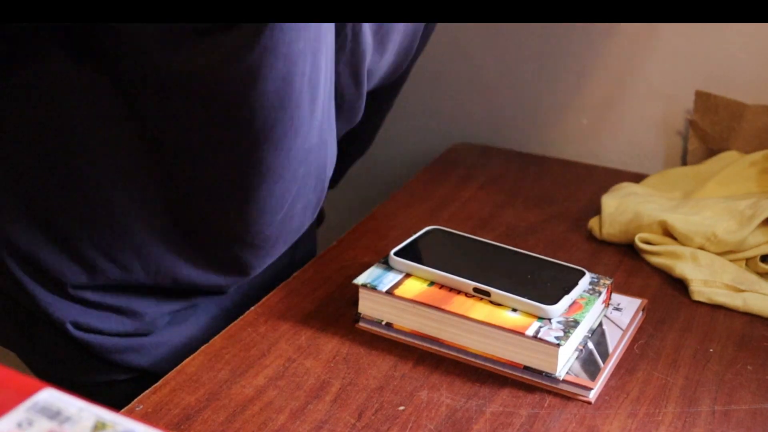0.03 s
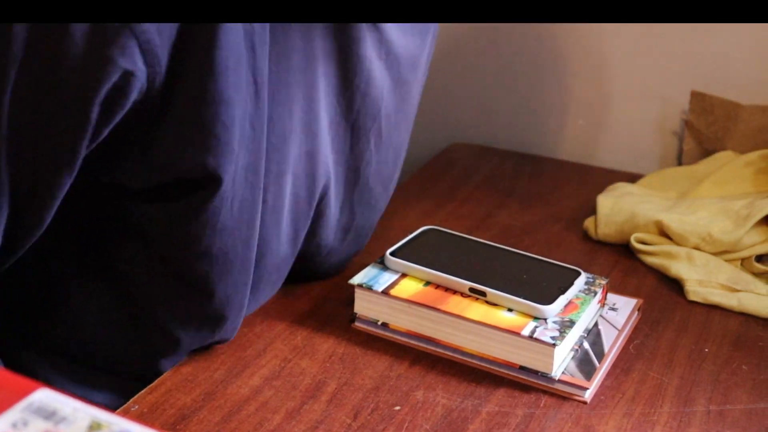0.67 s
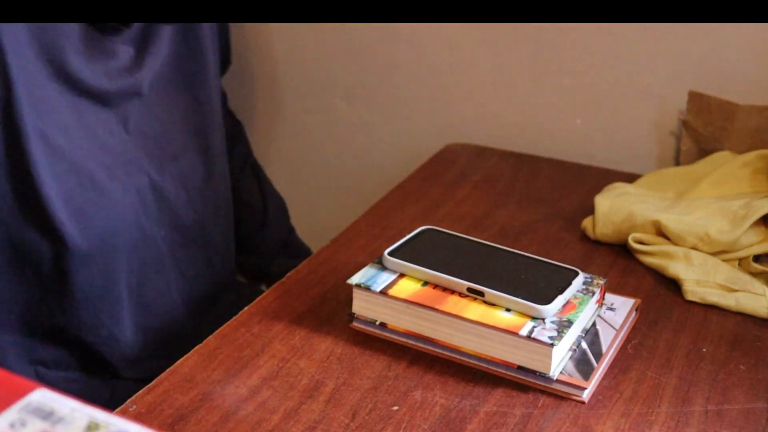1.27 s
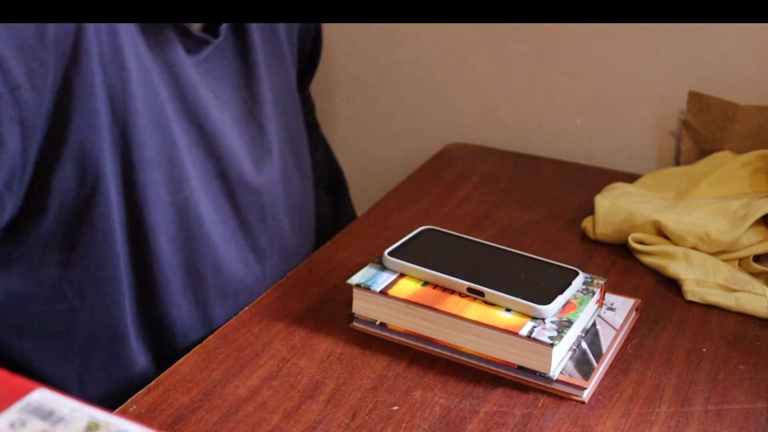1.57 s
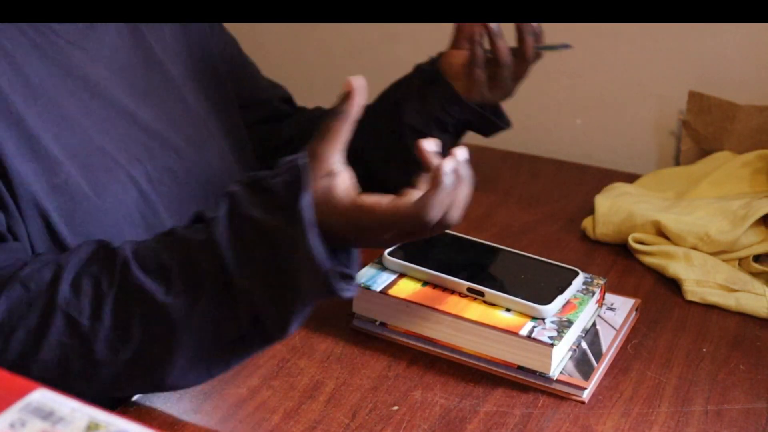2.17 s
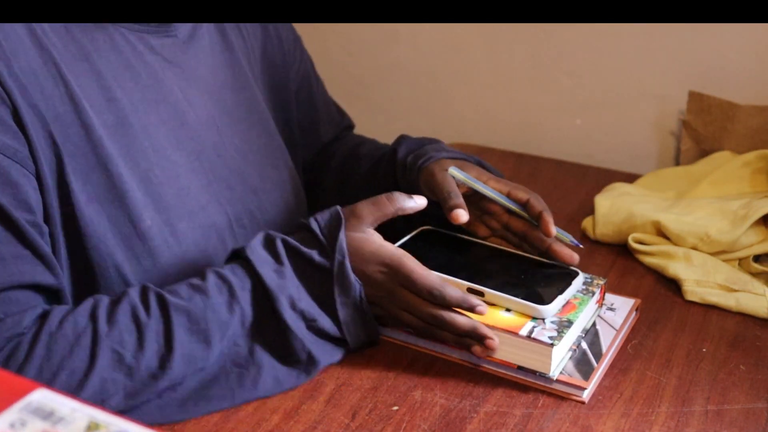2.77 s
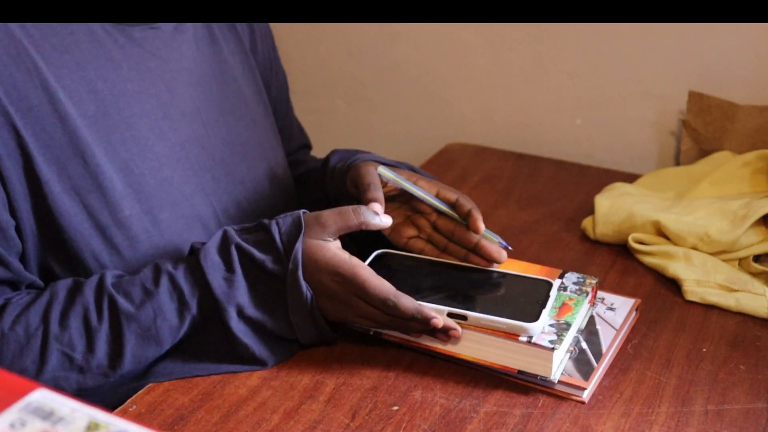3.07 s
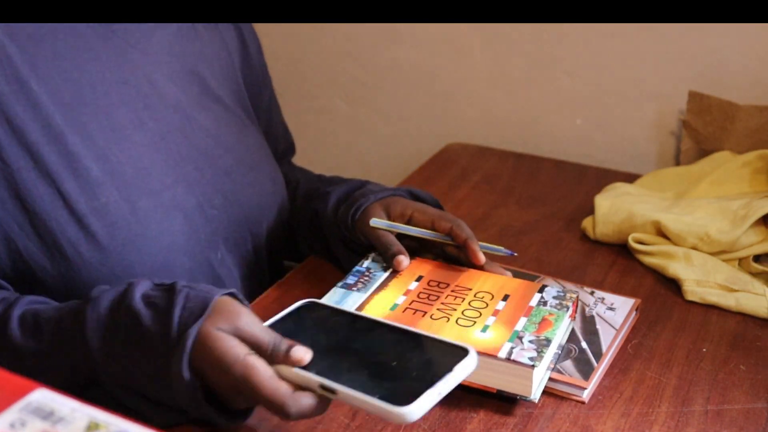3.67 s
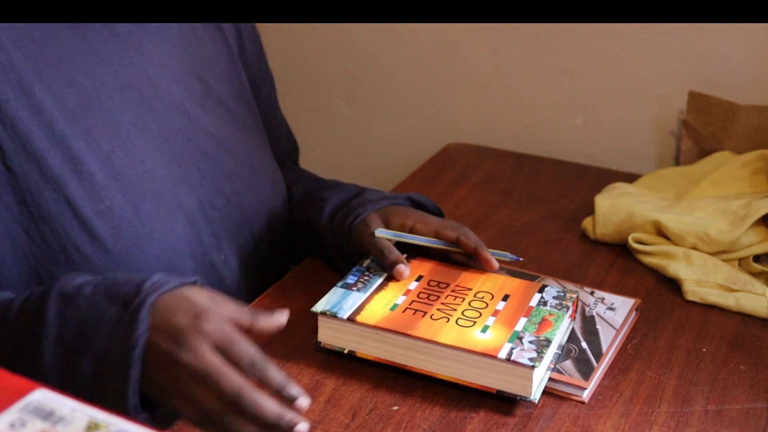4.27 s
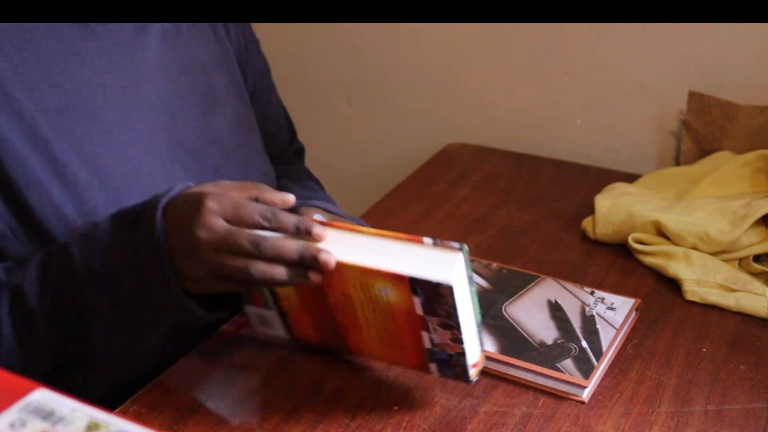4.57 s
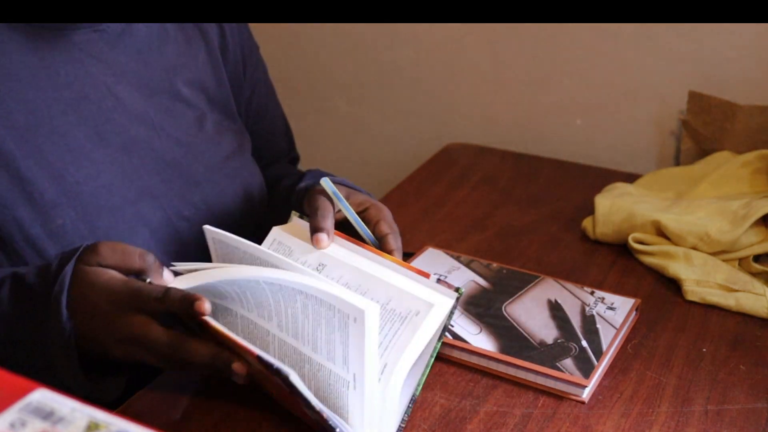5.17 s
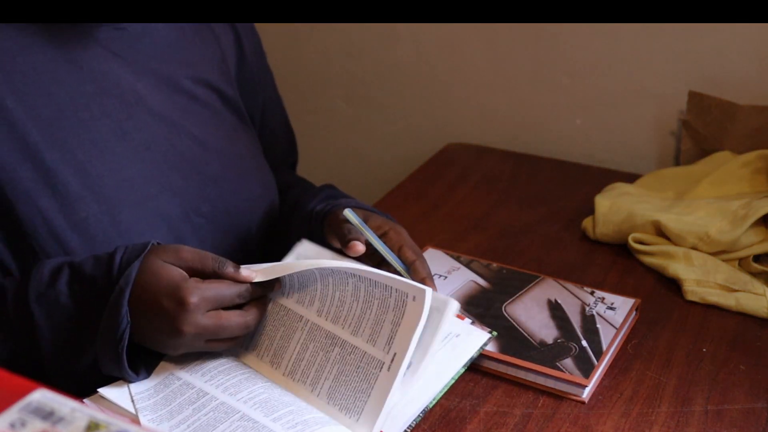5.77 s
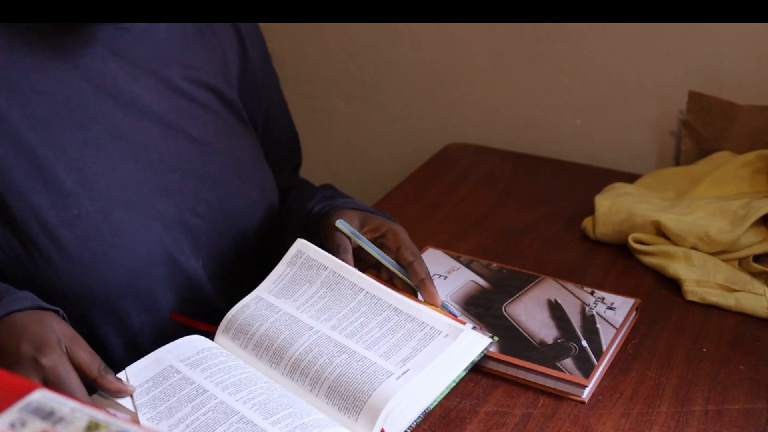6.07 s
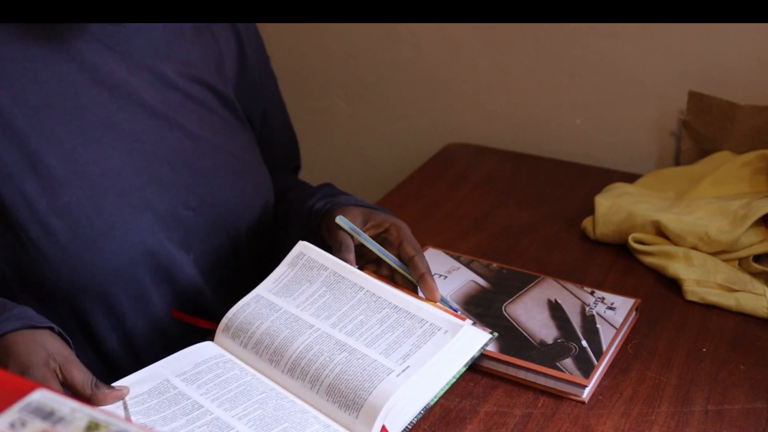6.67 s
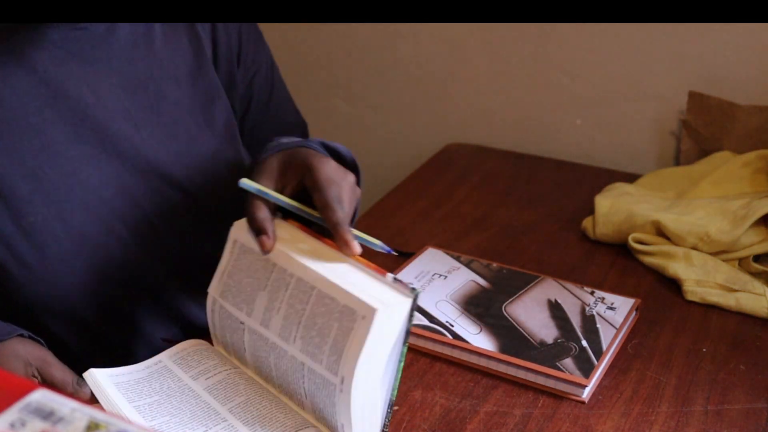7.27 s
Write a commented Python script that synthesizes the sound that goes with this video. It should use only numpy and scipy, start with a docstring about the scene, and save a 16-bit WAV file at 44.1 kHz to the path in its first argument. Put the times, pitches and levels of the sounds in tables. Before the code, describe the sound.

In a small, quiet room, a close stereo microphone picks up a desk drawer scraping open with hard knocks and banging shut, amid swishing clothes. Light taps and a hollow rub follow as a phone slides off a book, then bumps down on the wooden desk. The hardback thuds down next, and pages rustle and turn with one sharp snap. Thin, birdlike whistles sit very faintly in the room tone.

```python
"""Close stereo perspective on a wooden desk in a small, quiet room. A drawer judders open in two tugs,
cloth swishes as a pen is taken out, and the drawer rasps shut with a jolt (1.6 s). A phone rubs over a
hardback's hollow cover, then is set down in four thuds that ring the desk top (4.0-4.3 s). The book
lands on its spine with a puff of air (4.7 s), and its pages slide, crackle and flip to the end.
Room tone and a few faint, far whistles sit behind it all."""
import sys
import numpy as np
from scipy import signal
from scipy.fft import rfft, irfft, next_fast_len
from scipy.io import wavfile
from scipy.ndimage import uniform_filter1d

SR = 44100
rng = np.random.default_rng(int(sys.argv[2]) if len(sys.argv) > 2 else 0)


def pcm_store(signal):
    """Save signal as 16-bit PCM."""
    levels = np.round(np.clip(np.atleast_2d(signal), -1, 1) * 32767)
    wavfile.write(sys.argv[1], SR, levels.astype(np.int16).T)


N = 323413
T = np.arange(N) / SR
HIT_T = T[:SR // 2]  # time axis of a one-shot


def undb(db):
    """Decibels to gain."""
    return 10 ** (np.asarray(db) / 20)


def unit(x):
    """Normalise to rms 1."""
    return x / np.sqrt(np.mean(x ** 2))


def at_hz(points, hz):
    """Read a curve along a log-frequency axis."""
    f, value = np.transpose(points)
    return np.interp(np.log(hz + 1), np.log(f), value)


def equalise(x, eq):
    """Shape a sound with an EQ curve."""
    size = next_fast_len(x.shape[-1])
    gain = undb(at_hz(eq, np.fft.rfftfreq(size, 1 / SR)))
    return irfft(rfft(x, size) * gain, size)[..., :x.shape[-1]]


# Stereo width at the microphone: f/Hz, side relative to mid/dB
WIDTH = [(30, -8), (120, -9), (250, -6), (500, -4.5), (1000, -3.5), (2000, -0.5), (12000, 0)]
def spread(pair, eq):
    """Two unrelated signals become one EQ'd stereo texture at rms 1, narrow in the bass."""
    mid, side = equalise(pair, eq)
    side = equalise(side, WIDTH)
    return unit(np.array([mid + side, mid - side]))


def add(out, s, x):
    """Drop a sound on the timeline at s seconds."""
    i = max(int(s * SR), 0)
    out[:, i:i + x.shape[-1]] += x[..., :N - i]


def convolve(x, response):
    """Send a sound through an impulse response."""
    return signal.fftconvolve(x, np.atleast_2d(response), axes=-1)[:, :N]


def grains(per_s, scatter_db):
    """Friction grain: two streams of tiny slips, random in time and strength."""
    slips = rng.random(N) < per_s / SR
    strength = undb(scatter_db * np.minimum(rng.exponential(size=N), 4))
    return unit(rng.standard_normal((2, N)) * slips * strength)


def fade(t60):
    """One-shot decay, down 60 dB after t60 seconds."""
    return np.exp(-np.log(1000) * HIT_T / t60)


def burst(eq, db, rise, t60, punch=0):
    """Noise hit for a dense ring of modes; punch adds a transient, db is the rms of the first 25 ms."""
    attack = (1 - np.exp(-HIT_T / max(rise, 1e-4))) ** 2
    envelope = attack * (fade(t60) + punch * fade(0.015))
    x = spread(rng.standard_normal((2, len(HIT_T))), eq) * envelope
    return x * undb(db) / np.sqrt(np.mean(x[:, :SR // 40] ** 2))


def stroke(peak_s, length):
    """Speed of a gesture, 0-1: it swells and dies, staying within 20 dB of its peak for its length."""
    rise_share = 0.44
    away = np.maximum((peak_s - T) / rise_share, (T - peak_s) / (1 - rise_share)) / length
    return np.exp(-np.log(10) * np.minimum(away, 20))


# Room tone EQ: f/Hz, level/dB
ROOM_TONE_EQ = [(18, -60), (30, -55.5), (133, 9.5), (237, -1), (479, -2.5), (639, -2.5), (808, -0.5),
                (1050, -5), (1680, -5.5), (2020, -8), (5450, -13), (7080, -15.5), (15500, -19.5)]
def room_tone():
    """The quiet room's air: a steady, dark noise bed."""
    return undb(-60.5) * spread(rng.standard_normal((2, N)), ROOM_TONE_EQ)


# Reverb decay of the room: f/Hz, t60/s
ROOM_T60 = [(150, 0.19), (500, 0.53), (2500, 0.61), (6000, 0.29), (14000, 0.26)]
def room(x, early_db, late_db):
    """Early reflections off the desk top and near wall, then a faint tail from the rest of the room."""
    shape = (2, len(HIT_T))
    hz, s, bins = signal.stft(rng.standard_normal(shape), SR, nperseg=256)
    decay = np.exp(-np.log(1000) * s / at_hz(ROOM_T60, hz)[:, None])
    late = signal.istft(bins * decay, SR)[1][:, :len(HIT_T)]
    early_eq = [(100, -18.5), (400, 4), (1500, -1.5), (15000, -2.0)]  # f/Hz, level/dB
    early = spread(rng.standard_normal(shape), early_eq) * fade(0.14)
    response = undb(early_db) * unit(early * (HIT_T > 0.004))
    response += undb(late_db) * unit(late * (HIT_T > 0.015))
    return x + convolve(x, response / np.sqrt(len(HIT_T)))


# Thin whistles, like a far bird: t/s, length/s, f/Hz, level/dB
WHISTLES = [(.955, .14, 2417, -61), (2.18, .08, 2690, -72), (2.71, .06, 2690, -74), (3.19, .09, 2680, -72),
            (3.72, .06, 2690, -74), (3.82, .08, 1690, -72), (4.37, .13, 2229, -72), (4.55, .2, 2130, -76)]
def whistles():
    """Short, pure notes from far off, each eased in and out."""
    out = np.zeros((2, N))
    for s, length, hz, db in WHISTLES:
        t = HIT_T[HIT_T < length]
        swell = np.sin(np.pi * t / length)
        add(out, s, undb(db) * np.sqrt(2) * swell * np.sin(2 * np.pi * hz * t))
    return out


def rub_and_hiss(strokes):
    """Gain envelopes for a run of strokes; the hiss grows faster with speed than the rub."""
    rub, hiss = np.zeros(N), np.zeros(N)
    for s, length, rub_db, hiss_db in strokes:
        speed = stroke(s, length)
        rub = np.maximum(rub, undb(rub_db) * speed)
        hiss = np.maximum(hiss, undb(hiss_db) * speed ** 1.6)
    return rub, hiss


# Airy top end of sliding surfaces: f/Hz, level/dB
HISS_EQ = [(1800, -8), (4000, -1), (6000, -3), (8500, -6.5), (11000, -7.5), (15500, -12)]
def sliding(rub, hiss, rub_eq, per_s, scatter_db):
    """Fibres catch and let go as surfaces slide: a dull rub under a fine hiss."""
    body = rub * spread(grains(per_s, scatter_db), rub_eq)
    return body + hiss * spread(grains(per_s, scatter_db), HISS_EQ)


# Swishes of cloth and the hiss of the sliding drawer: peak t/s, length/s, rub level/dB, hiss level/dB
SWISHES = [(.035, 0.32, -49, -47), (.11, .1, -47.5, -49.5), (.29, 0.37, -51.5, -76),
           (.478, 0.073, -45, -39), (.535, 0.15, -30, -47), (.74, 0.48, -42, -49), (1.105, 0.11, -48, -48),
           (1.2, .21, -39.5, -36.5), (1.475, 0.19, -49.5, -62), (1.53, 0.21, -59, -41),
           (1.61, 0.15, -35, -44), (1.8, 0.58, -63, -61.5), (1.97, .2, -48, -59), (2.1, .3, -63.5, -73.5),
           (2.56, 0.43, -59.5, -66), (2.82, 0.15, -49, -50.5), (2.93, 0.26, -58, -56),
           (3.07, 0.091, -72, -58), (3.55, 0.25, -54.5, -56.5), (4.55, 0.19, -58, -56.5),
           (4.71, 0.22, -52, -47.5), (4.88, 0.21, -51, -51), (4.94, 0.064, -51, -41)]
# Rub EQ of the swishes: f/Hz, level/dB
SWISH_EQ = [(100, -13.5), (250, -15), (480, -6.5), (900, 0.5), (1600, 4.5), (2800, 0), (4500, -6.5),
            (7000, -17), (11000, -30.5)]
def swishes():
    """Dense, even slips blend into swishes of cloth and the hiss of the sliding drawer."""
    return sliding(*rub_and_hiss(SWISHES), SWISH_EQ, per_s=12000, scatter_db=0.5)


# Air squeezed from under the book and its covers: t/s, level/dB, t60/s
PUFFS = [(1.883, -44, 0.078), (4.680, -33.5, 0.074), (4.712, -27.5, 0.17), (6.576, -51, 0.061),
         (7.269, -54, 0.18)]
# Bassy puff EQ: f/Hz, level/dB
PUFF_EQ = [(30, -22), (60, 0), (120, 6), (170, 6.5), (260, -12), (450, -36.5)]
def puffs():
    """Two flat faces close and push out a soft, deep puff of air."""
    out = np.zeros((2, N))
    for s, db, t60 in PUFFS:
        add(out, s, burst(PUFF_EQ, db, rise=0.0062, t60=t60))
    return out


# Phone drags across the book: peak t/s, length/s, level/dB
PHONE_DRAGS = [(2.819, 0.11, -55), (2.976, 0.18, -57), (3.069, 0.035, -54), (3.188, 0.24, -59),
               (3.324, 0.41, -60), (3.504, 0.17, -57), (3.579, .18, -55)]
# Hollow body of the cover: f/Hz, level/dB
COVER_EQ = [(120, -5.5), (190, 10.5), (300, -6), (450, 2), (650, -10), (1000, -6), (2000, -33)]
def phone_drag():
    """The phone's case rubs over the hard cover, which sounds hollow."""
    drag = sum(undb(db) * stroke(s, length) for s, length, db in PHONE_DRAGS)
    return drag * spread(grains(per_s=2600, scatter_db=-0.5), COVER_EQ)


# Paper crackle EQ: f/Hz, level/dB
CRACKLE_EQ = [(100, -51), (400, -41), (1000, -6.5), (1800, 2), (3000, -1), (4500, -9.5), (8000, -30.5)]
def crackles(rub):
    """Small creases pop in the moving sheets, each with a tiny ring."""
    pops = spread(grains(per_s=150, scatter_db=5.0), CRACKLE_EQ) * rub
    sheet = rng.standard_normal(SR // 50) * fade(0.028)[:SR // 50]
    return undb(-12.5) * convolve(pops, sheet / np.sqrt(np.sum(sheet ** 2)))


def crinkle(depth_db, step_samples):
    """Level flutter of a sheet that catches and frees itself in quick, uneven steps."""
    steps = np.repeat(rng.standard_normal(N // step_samples + 1), step_samples)[:N]
    return undb(depth_db * uniform_filter1d(steps, step_samples // 2))


# Page-on-page slides: peak t/s, length/s, rub level/dB, hiss level/dB
PAGE_SLIDES = [(5.12, .14, -56.5, -57), (5.37, .14, -55.5, -56.5), (5.47, 0.44, -56, -72),
               (5.61, .1, -47, -58), (5.68, 0.26, -51, -52), (5.765, 0.084, -50.5, -47.5),
               (6, 0.13, -66, -54), (6.1, 0.78, -54, -57), (6.35, 0.11, -60, -49.5),
               (6.41, 0.16, -48, -50.5), (6.47, 0.07, -45.5, -86), (6.63, 0.093, -49, -45.5),
               (6.72, 0.21, -47, -56), (6.83, 0.2, -50, -58), (6.93, .08, -59, -58), (7.01, 0.36, -50, -61),
               (7.31, .2, -54, -66)]
# Paper rub EQ: f/Hz, level/dB
PAPER_EQ = [(100, -11), (250, -1.5), (480, -9), (900, 3), (1400, -1), (2600, -3), (4200, -10.5),
            (7000, -31)]
# Thin hiss of a lifted page's edge: f/Hz, level/dB
PAGE_EDGE_EQ = [(5500, -40), (6700, -7), (7350, 0), (8000, -7), (9500, -40)]
def pages():
    """Sheets slide, crease and hiss along one edge; the book rustles faintly all the while it is held."""
    rub, hiss = rub_and_hiss(PAGE_SLIDES)
    held = np.clip((T - 3.6) / 0.064, 0, 1)
    rub, hiss = np.hypot(rub, undb(-67.5) * held), np.hypot(hiss, undb(-70.5) * held)
    rustle = sliding(rub, hiss, PAPER_EQ, per_s=5000, scatter_db=2.8)
    rustle *= crinkle(depth_db=2.4, step_samples=800)
    edge_gain = undb(-70) * stroke(peak_s=7.07, length=0.9)
    edge = edge_gain * spread(rng.standard_normal((2, N)), PAGE_EDGE_EQ)
    return rustle + crackles(rub) + edge


# Flicks of paper, cover and case: t/s, flap level/dB, crackle level/dB, hiss level/dB, base t60/s
FLICKS = [(4.232, -47, -48, -44, 0.1), (4.714, -65, -39, -53, 0.099), (4.909, -78, -46, -43.5, 0.2),
          (5.166, -45, -43.5, -70, 0.059), (5.258, -84, -72, -55.5, .04), (5.327, -53.5, -48, -60, 0.16),
          (5.395, -52.5, -51.5, -77, 0.24), (5.435, -42, -45.5, -60, 0.022), (5.476, -35.5, -61, -50, 0.22),
          (5.811, -38.5, -38.5, -52.5, 0.38), (5.862, -35, -35, -41.5, 0.047),
          (5.946, -42, -33.5, -44.5, 0.14), (5.964, -45, -47, -46, 0.052), (6.019, -58, -50.5, -48, 0.031),
          (6.578, -46.5, -55, -80, 0.042), (7.191, -56, -49.5, -74, 0.086), (7.235, -43, -49, -66, 0.036),
          (7.239, -36, -36, -62, 0.088), (7.274, -46, -49.5, -56, 0.026), (7.306, -73, -51, -44.5, 0.042)]
# Body of the flap: f/Hz, level/dB
FLAP_EQ = [(50, -36), (150, -19), (330, -9.5), (480, -24), (700, -12), (900, -4), (1200, -11), (2500, -52)]
def flicks():
    """A brief, faint swell of noise leads into each flick; a sheet flaps, crackles and hisses over."""
    out = np.zeros((2, N))
    rise_s, lead_in_t60_s, lead_in_db = 0.00082, 0.048, -15
    for s, flap_db, crackle_db, hiss_db, t60 in FLICKS:
        lead_in = burst(CRACKLE_EQ, crackle_db, 0, lead_in_t60_s)
        lead_in += burst(HISS_EQ, hiss_db, 0, lead_in_t60_s)
        add(out, s - HIT_T[-1], undb(lead_in_db) * lead_in[:, ::-1])  # reversed, so it swells
        add(out, s, burst(FLAP_EQ, flap_db, rise_s, t60, punch=0.34))
        add(out, s, burst(CRACKLE_EQ, crackle_db, rise_s, t60, punch=0.65))
        add(out, s, burst(HISS_EQ, hiss_db, rise_s, t60 * 0.92, punch=0.4))
    return out


# Page snaps: t/s, peak level/dB
SNAPS = [(5.8688, -13), (7.276, -28)]
def snaps():
    """A page buckles with a sharp click, near the centre of the image."""
    out = np.zeros((2, N))
    band = signal.butter(1, [900, 5000], "band", fs=SR, output="sos")
    for s, db in SNAPS:
        mid, side = rng.standard_normal((2, len(HIT_T))) * fade(0.0026)
        snap = signal.sosfilt(band, [mid + 0.18 * side, mid - 0.18 * side])
        add(out, s, undb(db) * snap / np.abs(snap).max())
    return out


# Resonances of the desk's thin panels: f/Hz, level/dB
PANEL_MODES = [(481, 0), (538, -4), (615, -2), (829, -3), (919, 0), (1180, -3), (1335, -2), (1405, -3),
               (1596, -3), (1931, -3), (2331, -3), (2510, -3), (2722, -4), (2934, -5), (3134, -6),
               (4131, -5)]
def panels(x):
    """Contact noise sets the thin panels ringing briefly, in a different phase on each side."""
    phases = rng.uniform(0, 2 * np.pi, (len(PANEL_MODES), 2, 1))
    modes = sum(undb(db) * np.sin(2 * np.pi * hz * HIT_T + p) for (hz, db), p in zip(PANEL_MODES, phases))
    ring = modes * fade(0.075)
    return x + undb(-14) * convolve(x, ring / np.sqrt(np.sum(ring[0] ** 2)))


# Low modes of the desk top: f/Hz, level/dB, unloaded t60/s
DESK_MODES = [(112, -26.5, 0.072), (146.9, -2, 0.15), (172, -5, 0.14), (186.75, 5, 0.17),
              (210.5, 4.5, 0.09), (256.3, 4.5, 0.085), (363, -5.5, 0.14), (398.5, -16, 0.19),
              (488, -9, 0.086), (605, -14.5, 0.27), (695, -21.5, .12)]
def thump(peak_db, contact_s, ring_share):
    """A blow pushes the desk: longer contact is deeper and slower; a resting load shortens the ring."""
    ring = sum(undb(db) * np.sin(2 * np.pi * hz * HIT_T) * fade(t60 * ring_share)
               for hz, db, t60 in DESK_MODES)
    push = np.sin(np.pi * np.minimum(HIT_T[:SR // 50] / contact_s, 1))
    swing = (1 - np.exp(-HIT_T / (2.17 * contact_s))) ** 2  # the boards take a few cycles to swing up
    bass_cut = signal.butter(4, 105, "high", fs=SR, output="sos")  # a board this size radiates no sub
    x = signal.sosfilt(bass_cut, signal.fftconvolve(ring * swing, push))
    return undb(peak_db) * x / np.abs(x).max()


# Low, mid and high layers of a wood hit, each: f/Hz, level/dB
KNOCK_EQ = [(50, -55), (120, -28), (270, -1), (500, 0), (800, -4), (1200, -17), (2500, -45)]
CLACK_EQ = [(100, -54), (400, -43), (900, 1.5), (1500, 1), (2500, -3.5), (3600, -19), (5500, -24),
            (9000, -53.5)]
CRACK_EQ = [(1500, -52), (2900, -1), (4000, -1.5), (5500, -9), (7500, -14), (10000, -24), (15500, -35.5)]
def clatter(knock_db, clack_db, crack_db, contact_s, base_t60):
    """The wood answers a blow with a low knock, a clack and a bright crack."""
    return (burst(KNOCK_EQ, knock_db, rise=0.61 * contact_s, t60=base_t60 * 0.65, punch=0.39)
            + burst(CLACK_EQ, clack_db, rise=0.67 * contact_s, t60=base_t60 * 0.78, punch=0.26)
            + burst(CRACK_EQ, crack_db, rise=0.94 * contact_s, t60=base_t60 * 0.98, punch=0.24))


# Hits on the desk top:
# t/s, thump peak level/dB, clack level/dB, crack level/dB, contact/ms, ring share (0-1)
DESK_HITS = [(0.208, -33.5, -60, -85, 4.9, 0.82), (1.881, -31, -64, -61.5, 7.8, .3),
             (1.954, -33.5, -49, -56, 1.9, 0.95), (2.385, -43.5, -72.5, -72, 7.14, 0.56),
             (2.64, -36, -55.5, -56.5, 4.2, 0.5), (3.263, -43.5, -64, -63.5, 4.7, .45),
             (3.353, -38.5, -59, -70, 2.2, 0.63), (3.369, -45, -59, -56, 2.1, 0.8),
             (3.692, -57, -62, -61.5, 1.8, 0.63), (4.043, -24.5, -49, -75, 1.6, 0.64),
             (4.127, -29.5, -48, -70, 3.8, 0.22), (4.137, -16.5, -43.5, -77, 3.9, 0.94),
             (4.226, -21.5, -35, -61, 1.26, 0.85), (4.234, -11, -51, -60, 2.86, 0.57),
             (4.249, -17.5, -45, -67, 4.4, 0.23), (4.299, -17, -51.5, -60, 4.5, 0.8),
             (4.31, -13, -73, -77, 3.8, .52), (4.429, -35.5, -63, -66, 3.4, 0.68),
             (4.512, -42, -52.5, -63, 0.95, 0.8), (4.676, -36, -54, -53.5, 5.1, 0.1),
             (4.691, -16, -45, -46.5, 7.2, 0.43), (4.714, -10.5, -50, -32, 1.34, 0.76),
             (4.822, -38, -80, -70, 4.3, 0.96), (4.915, -46.5, -74, -55, 4.2, 0.9),
             (5.066, -43, -59, -57, 0.97, 0.75), (5.481, -38, -44, -70, 1.9, 0.74),
             (5.86, -28, -61, -39, 0.82, 0.64), (6.025, -36.5, -61, -74, 1.3, 0.64),
             (6.578, -42, -46.5, -73, 1.8, 0.6), (7.2, -40.5, -48, -78, 2.3, 0.58),
             (7.261, -37.5, -52, -57, 4.5, 0.7)]
def desk_hits():
    """Hands, phone and book land on the desk top, where the books damp the clatter."""
    thumps, wood = np.zeros((2, N)), np.zeros((2, N))
    for s, thump_db, clack_db, crack_db, contact_ms, ring_share in DESK_HITS:
        contact_s = contact_ms / 1000
        knock_db = thump_db - 15 - 6 * np.log2(contact_ms)  # softer hits knock less
        add(thumps, s - contact_s, thump(thump_db, contact_s, ring_share))
        add(wood, s, clatter(knock_db, clack_db, crack_db, contact_s, base_t60=0.07))
    return thumps + panels(wood)


# Drawer runs, two out and one back: t/s, length/s, attack/s, rumble level/dB, scrape level/dB
DRAWER_RUNS = [(0.427, 0.19, 0.1, -23, -32.5), (0.674, 0.11, 0.01, -22.5, -40),
               (1.499, 0.11, 0.017, -29, -30)]
# Low judder and gritty rasp of the runners, each: f/Hz, level/dB
RUMBLE_EQ = [(40, -40), (80, -35), (125, 2), (170, 6.5), (250, 6), (350, -5), (480, -12.5), (900, -55.5)]
SCRAPE_EQ = [(200, -27), (480, 4), (750, 9.5), (1100, 2.5), (2200, -0.5), (3500, -10), (5800, -15),
             (7500, -33), (15500, -34.5)]
def drawer_runs():
    """Wood sticks and slips on wood: quick judders shake the desk, each letting go a rasp of fine slips."""
    rumble_gain, scrape_gain = np.zeros(N), np.zeros(N)
    release_t60_s = 0.31
    for s, length, attack, rumble_db, scrape_db in DRAWER_RUNS:
        speed = np.clip((T - s) / attack, 0, 1)
        release = np.exp(-np.log(1000) * np.maximum(T - s - length, 0) / release_t60_s)
        rumble_gain += undb(rumble_db) * np.sqrt(speed) * release
        scrape_gain += undb(scrape_db) * speed ** 0.8 * release  # grows faster with speed than the rumble
    judder = spread(grains(per_s=780, scatter_db=-0.8), RUMBLE_EQ)
    power = uniform_filter1d(np.mean(judder ** 2, axis=0), size=700)
    rumble = unit(judder / np.sqrt(power + 0.05))  # friction limits the swing, like a compressor
    grip = unit(np.maximum(rumble.mean(axis=0), 0) + 0.55)
    scrape = spread(grains(per_s=14000, scatter_db=1.5), SCRAPE_EQ) * grip
    return rumble * rumble_gain + panels(scrape * scrape_gain)


# Drawer jolts: t/s, thump peak level/dB, clack level/dB, crack level/dB
DRAWER_JOLTS = [(.435, -34, -52.5, -68.5), (.483, -41, -31, -64), (.558, -7, -24.5, -36.5),
                (.689, -9, -25.5, -53), (.789, -10, -22, -30), (0.932, -35.5, -50, -57.5),
                (1.603, -15.5, -19.5, -22)]
def drawer_jolts():
    """The drawer hits its guides and stops hard, and rattles on."""
    thumps, wood = np.zeros((2, N)), np.zeros((2, N))
    contact_s = 0.00133
    for s, thump_db, clack_db, crack_db in DRAWER_JOLTS:
        knock_db = clack_db - 0.5
        add(thumps, s - contact_s, thump(thump_db, contact_s, ring_share=0.75))
        add(wood, s, clatter(knock_db, clack_db, crack_db, contact_s, base_t60=0.16))
    return thumps + panels(wood)


def scene():
    """The mix: far whistles and close foley share one reverb, over the room tone."""
    handling = swishes() + puffs() + phone_drag()
    paper = pages() + flicks() + snaps()
    wood = desk_hits() + drawer_runs() + drawer_jolts()
    return room_tone() + room(whistles() + handling + paper + wood, early_db=-9.0, late_db=-23.5)


def record(dry):
    """The stereo microphone: the mids lean slightly left, and a steep low-pass cuts the very top."""
    left_eq = [(150, -0.0069), (600, 0.41), (1200, 0.73), (2400, -0.31), (12000, -0.38)]  # f/Hz, level/dB
    right_eq = [(hz, -db) for hz, db in left_eq]
    x = np.array([equalise(dry[0], left_eq), equalise(dry[1], right_eq)])
    top_cut = signal.ellip(10, 0.2, 80, 15900, fs=SR, output="sos")
    return signal.sosfilt(top_cut, np.clip(x, -1, 1))


dry = scene()
out = record(dry)
pcm_store(out)
```